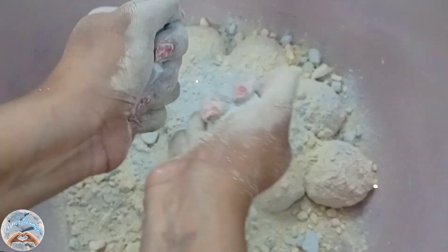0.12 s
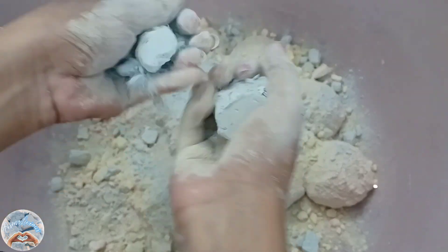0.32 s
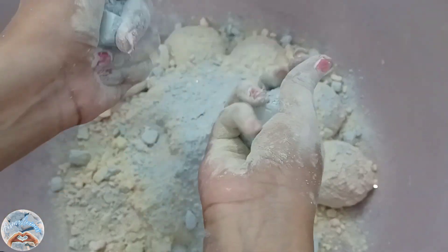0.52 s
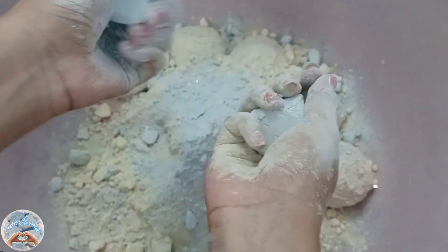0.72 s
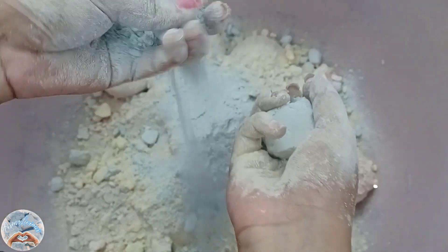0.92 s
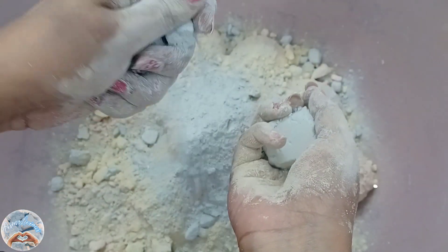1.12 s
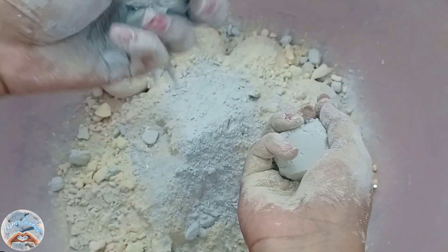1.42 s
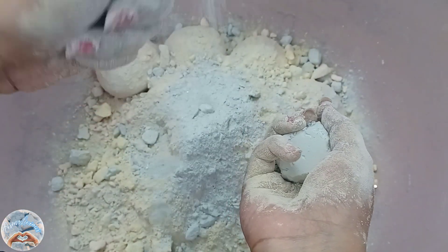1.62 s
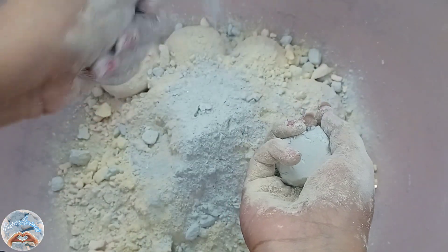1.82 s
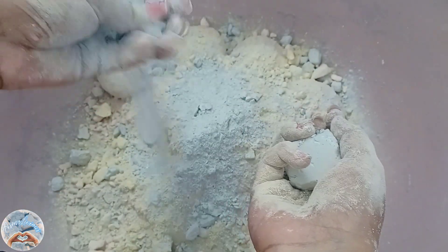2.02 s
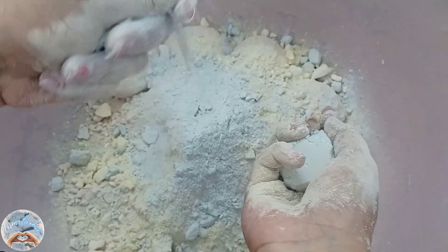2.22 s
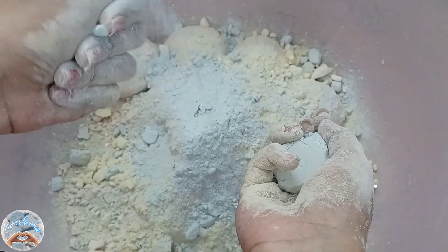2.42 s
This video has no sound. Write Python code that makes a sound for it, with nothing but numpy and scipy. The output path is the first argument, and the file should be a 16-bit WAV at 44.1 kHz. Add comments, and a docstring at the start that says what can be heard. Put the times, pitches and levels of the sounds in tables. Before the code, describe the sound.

Chalk crumbled by hand, close and dry. Faint tick at 0.07 s, then a loud, brittle cluster of cracks at 0.2 s with debris rattling until about 0.35 s. Quieter ticks, gritty rubs and soft hollow bowl knocks follow around 0.53, 0.95 and 1.45 s. A smaller crunch comes at 1.86 s, crisp snaps at 2.28 s. Thin powder hiss and steady low hum throughout.

```python
"""Chalk crumbled over a bowl

Hands crumble lumps of chalk over a bowl, heard up close in a quiet room with a low hum.
Ticks and cracks are noise puffs through resonances; slides, hiss and crumble are granular noise.
Falling bits ring the bowl, a sum of decaying modes; filtered noise and a sine make the room.
"""
import sys
import numpy as np
from scipy import signal
from scipy.fft import rfft, irfft
from scipy.io import wavfile
from scipy.ndimage import uniform_filter1d

SR = 44100
rng = np.random.default_rng(int(sys.argv[2]) if len(sys.argv) > 2 else 0)


def wrap_up_sound(samples):
    """Save the sound to the file named by the first command line argument, as 16-bit audio."""
    columns = np.atleast_2d(samples).T
    # keep every value between -1 and 1, then stretch to whole-number steps
    tamed = np.clip(columns, -1, 1)
    steps = np.round(tamed * 32767).astype(np.int16)
    wavfile.write(sys.argv[1], SR, steps)


def invert_db(level):
    """Linear amplitude ratio for a level in decibels (20 dB per decade), elementwise."""
    return 10 ** (np.asarray(level, dtype=float) / 20)


N = 112455  # length [samples]


def evened(x):
    """Power normalization: scales a signal to rms 1."""
    return x / np.sqrt(np.mean(x ** 2) + 1e-20)


def colour(x, points):
    """Linear filtering: weights the spectrum by (frequency [Hz], gain [dB]) over log frequency."""
    f, db = np.transpose(points)
    hz = np.fft.rfftfreq(N, 1 / SR)
    gain_db = np.interp(np.log(hz + 1), np.log(f + 1), db)
    return irfft(rfft(x) * invert_db(gain_db), N)


def add(mix, s, sound):
    """Superposition: adds a sound to the mix at a time in seconds."""
    part = mix[round(s * SR):][:len(sound)]
    part += sound[:len(part)]


def band(x, hz, q):
    """Resonance: a second-order peak passes energy around one frequency."""
    return signal.lfilter(*signal.iirpeak(min(hz, SR / 2.5), max(q, .3), SR), x)


def snap(noise, db, hz, q, t60, air_db):
    """Impulsive excitation: a spike and a noise puff drive a broad body, its ring and a sharp edge."""
    rise_s, spike, edge_hz = .001, 1.6, 10100
    tail_db, tail_t60_s, ring_db = -18, 0.028, -15
    t = np.arange(len(noise)) / SR
    rise = np.minimum(t / rise_s, 1) ** 2
    decay = invert_db(-60 * t / max(t60 / 2, .001)) + invert_db(tail_db - 60 * t / tail_t60_s)
    drive = noise * rise * decay
    drive[round(rise_s * SR)] += spike * np.sign(noise[0])
    edge = signal.sosfilt(signal.butter(2, edge_hz, "high", fs=SR, output="sos"), drive)
    body = band(band(drive, hz, q), hz, q)
    ring_q = hz * t60 * np.pi / np.log(1000)  # the Q of a resonance with this decay time
    rings = band(body, hz, ring_q)
    body, rings, edge = (v / abs(v).max() for v in (body, rings, edge))
    return invert_db(db) * (body + invert_db(ring_db) * rings + invert_db(air_db) * edge)


# crumbs snapping: (time [s], body peak level [dB], centre frequency [Hz], edge level re body [dB])
CRUMB_TICKS = [(0.0697, -12.5, 7140, -32), (0.1702, -18.5, 5100, -15), (0.178, -12, 9000, -22),
               (0.196, -11, 5670, -20), (0.201, -48, 4380, -11), (0.2057, -6, 4020, 8),
               (0.2111, 1.5, 6980, -33), (0.244, -23, 5500, -16), (0.3182, -20.5, 5170, -30),
               (0.33, -28, 5960, -18), (0.3945, -22.5, 11100, -14), (0.4227, -25, 5550, -22),
               (0.5312, -13.5, 10500, -4), (0.62, -16.5, 10300, -26), (0.8538, -21.5, 8100, -25),
               (0.9398, -24, 8300, -8), (0.9534, -17.5, 8300, -26), (0.9726, -22, 7930, -24),
               (0.9778, -24, 8000, -26), (1.0345, -23, 4960, -25), (1.0408, -19.5, 7600, -20),
               (1.0755, -18, 7050, -23), (1.1717, -15, 11100, -13), (1.184, -15.5, 10900, -17),
               (1.4437, -14, 9800, -12), (1.456, -19, 8000, -25), (1.486, -19.5, 8600, -35),
               (1.5095, -23, 9870, -27), (1.58, -25.5, 7760, -21), (1.6412, -16.5, 5870, -27),
               (1.6697, -15, 8730, -35), (1.8462, -13.5, 9000, -18), (1.855, -7.5, 6730, -26),
               (1.8594, -11, 6240, -20), (1.8687, -23, 5200, -15), (1.942, -12.5, 8500, -27),
               (1.9506, -17, 8500, -6), (1.9654, -8, 8200, -33), (2.064, -12.5, 9000, 2),
               (2.071, -21, 8200, -22), (2.103, -19.5, 5800, -26), (2.171, -14, 6700, -18),
               (2.2795, -5.5, 7400, -15), (2.2858, -6, 8850, -10), (2.4384, -18.5, 8700, -31),
               (2.4616, -25.5, 9150, -6), (2.5094, -19.5, 7100, -39)]


def ticks():
    """Broadband transients: small crumbs snap as short, high, heavily damped puffs."""
    out = np.zeros(N)
    noises = rng.standard_normal((len(CRUMB_TICKS), 2048))
    for (s, db, hz, edge_db), noise in zip(CRUMB_TICKS, noises):
        add(out, s, snap(noise, db, hz, q=1.2, t60=.005, air_db=edge_db))
    return out


# lumps cracking: (time [s], body peak level [dB], centre frequency [Hz], ring t60 [s])
LUMP_CRACKS = [(0.0704, -31.5, 1335, 0.055), (0.17, -24.5, 1140, 0.04), (0.179, -24, 1060, 0.034),
               (0.1934, -21, 1520, 0.042), (0.2002, -4, 1720, 0.015), (0.2039, -6.5, 1330, 0.012),
               (0.205, -2.5, 1900, 0.033), (0.2104, 1.5, 1364, 0.014), (0.2158, -30, 1500, 0.0046),
               (0.2438, -8.5, 1840, 0.012), (0.2474, -19, 1080, 0.022), (0.3182, -40.5, 1810, 0.029),
               (0.3302, -24, 1250, 0.024), (0.3407, -27.5, 1720, 0.017), (0.5313, -28, 1720, 0.011),
               (0.8869, -38.5, 1007, 0.011), (0.9522, -34, 1520, 0.009), (0.9835, -32, 1310, 0.012),
               (1.0344, -18, 2060, 0.0051), (1.6402, -31.5, 1220, 0.022), (1.6671, -31, 1290, 0.015),
               (1.8385, -24, 2400, 0.015), (1.8598, -9, 3450, 0.0021), (1.8758, -27, 3800, 0.012),
               (1.9933, -33.5, 2190, 0.029), (2.171, -30, 2784, 0.11), (2.2326, -30, 2630, 0.021),
               (2.2804, -28, 1200, 0.022), (2.2864, -22, 1820, 0.037), (2.5106, -36.5, 1120, 0.014)]


def cracks():
    """Brittle fracture: lumps break between the fingers as lower puffs, each with its own decay."""
    out = np.zeros(N)
    noises = rng.standard_normal((len(LUMP_CRACKS), 2048))
    for (s, db, hz, t60), noise in zip(LUMP_CRACKS, noises):
        add(out, s, snap(noise, db, hz, q=1.13, t60=t60, air_db=-22))
    return out


def grains(per_s, spread_db, share, t60):
    """Shot noise: sparse clicks of uneven size, smeared into puffs and mixed with smooth noise."""
    spread = spread_db * np.minimum(rng.exponential(1, N), 5)
    size = invert_db(spread) * (rng.random(N) < per_s / SR)
    puffs = np.sqrt(signal.lfilter([1], [1, -invert_db(-120 / (t60 * SR))], size ** 2))  # smears power
    share = np.clip(share, 0, 1)
    grainy = evened(puffs * rng.standard_normal(N))
    smooth = rng.standard_normal(N)
    return np.sqrt(share) * grainy + np.sqrt(1 - share) * smooth


def grit(points, edges_hz, *grain):
    """Independent grain trains: large and small grains fall apart in time but flutter together."""
    flutter_db, flutter_s = 1.6, .01
    hz, total = np.fft.rfftfreq(N, 1 / SR), 0
    for lo, hi in zip(edges_hz, edges_hz[1:]):
        train = rfft(grains(*grain))
        total = total + train / (1 + (lo / (hz + 1)) ** 6) / (1 + (hz / hi) ** 6)
    span = round(flutter_s * SR)
    flutter = evened(uniform_filter1d(uniform_filter1d(rng.standard_normal(N), span), span))
    return evened(invert_db(flutter_db * flutter) * colour(irfft(total, N), points))


# crumble spectrum: (frequency [Hz], relative level [dB])
CRUMBLE_SPECTRUM = [(500, -25), (800, -6), (1200, 0), (1800, -2), (2500, -6), (3500, -12), (5000, -19),
                    (9000, -36)]


def crumbs():
    """Granular noise: crumbs break off and tumble, at rms 1."""
    per_s, spread_db, share, t60_s = 420, 2.8, .55, .006
    return grit(CRUMBLE_SPECTRUM, [300, 1100, 2000, 3500, 12000], per_s, spread_db, share, t60_s)


# bits of the broken lump rattling down: (time [s], level [dB])
DEBRIS_LEVEL = [(.2, -60), (0.213, -57), (0.239, -27.5), (.262, -34), (0.269, -37.5), (.31, -41.5),
                (.35, -49), (.37, -66), (0.497, -50.5), (.52, -93)]


def debris():
    """Amplitude modulation: bits of the broken lump tumble over each other, rising and dying away."""
    s, db = np.transpose(DEBRIS_LEVEL)
    level_db = np.interp(np.arange(N) / SR, s, db, -120, -120)
    return invert_db(level_db) * crumbs()


# fingers sliding on powder; the last three rows are lower, broad rattles of bits around the bigger crushes:
# (start [s], length [s], rms level before fades [dB], centre frequency [Hz])
BROAD_RUBS = [(.215, 0.053, -36, 7300), (.42, 0.091, -45, 7400), (.654, 0.06, -42, 8200),
              (.9, .04, -41.5, 9500), (.99, 0.023, -38.5, 9000), (1.086, 0.013, -31, 8200),
              (1.295, 0.047, -34, 8700), (1.80, .02, -41, 9150), (1.978, 0.025, -37.5, 8500),
              (2.09, .03, -39.5, 7500), (.975, 0.025, -38.5, 1800), (1.832, 0.066, -40, 4400),
              (2.276, 0.054, -46, 2020)]
# hard crumbs skidding: (start [s], length [s], rms level before fades [dB], own pitch [Hz])
CRUMB_SKIDS = [(.462, 0.062, -49, 1150), (.558, 0.01, -37, 1020), (.588, 0.0077, -35, 1050),
               (1.088, 0.038, -44.5, 2620), (1.443, 0.045, -44, 1047), (2.207, 0.03, -45.5, 2490),
               (2.32, 0.014, -40.5, 1700)]


def slides():
    """Friction noise: granular scrape through a broad (rub) or narrower (skid) resonance."""
    out = np.zeros(N)
    scrape = grains(per_s=1100, spread_db=3.4, share=.7, t60=.002)
    # a power below 1 makes skids peak early and die away
    for table, q, power in ((BROAD_RUBS, 1.2, 1), (CRUMB_SKIDS, 5.5, .5)):
        for s, length, db, hz in table:
            part = scrape[round(s * SR):][:round(length * SR)]
            fade = np.sin(np.pi * np.linspace(0, 1, len(part)) ** power)
            add(out, s, invert_db(db) * evened(band(band(part, hz, q), hz, q)) * fade)
    return out


# powder hiss spectrum: (frequency [Hz], relative level [dB])
HISS_SPECTRUM = [(2000, -15.5), (3500, -15), (4500, -4), (5500, 0), (7000, 3), (9000, 2), (12000, 0.5),
                 (15500, -1.5), (17000, -37)]


def powder():
    """Granular noise: many fine grains of powder hiss through the hand, at rms 1."""
    per_s, spread_db, share, t60_s = 900, 3.6, .6, .003
    return grit(HISS_SPECTRUM, [1500, 6000, 9000, 12500, 20000], per_s, spread_db, share, t60_s)


# the hand's work: (time [s], powder hiss level [dB], crumble level [dB], trickle on the bowl level [dB])
HAND_WORK = [(0.0, -45, -44, -51.5), (0.16, -47, -67.5, -51), (0.29, -41.5, -44.5, -40.5),
             (0.38, -42.5, -50, -65), (0.46, -42, -61, -46), (0.59, -46, -55.5, -57),
             (0.7, -48.5, -97, -100), (0.911, -45.5, -65, -43), (1.06, -41, -53, -45.5),
             (1.13, -43.5, -57, -55), (1.28, -43.5, -61, -67), (1.43, -50.5, -92, -59),
             (1.53, -41.5, -57.5, -45.5), (1.68, -42.5, -52, -48.5), (1.77, -47, -72, -45),
             (1.858, -39.5, -38.5, -38), (1.94, -45, -58.5, -40), (2.06, -41.5, -53.5, -47),
             (2.16, -41, -52.5, -51.5), (2.29, -41.5, -51, -37), (2.45, -45.5, -68, -59),
             (2.55, -46.5, -60, -40.5)]


def work(column):
    """Envelope control: gain over time from one column of the hand's work."""
    rows = np.array(HAND_WORK)
    return invert_db(np.interp(np.arange(N) / SR, rows[:, 0], rows[:, column]))


def chalk():
    """Superposition: ticks, cracks and slides at their moments, over hiss and crumble."""
    steady = work(column=1) * powder() + work(column=2) * crumbs()
    return ticks() + cracks() + slides() + steady


def ring(modes, luck, t):
    """Modal synthesis: softly starting, decaying sines; luck shifts each mode's level and pitch."""
    rise_s, spread_db, detune = 0.0019, 2.2, .03  # detune is a fraction of the frequency
    total = 0
    for (hz, db, t60), z in zip(modes, luck):
        decay = invert_db(db + spread_db * z - 60 * t / t60)
        total = total + decay * np.sin(2 * np.pi * hz * (1 + detune * z) * t)
    return (1 - np.exp(-t / rise_s)) * total


# bits landing in the bowl: (time [s], level [dB], upper modes' level re lower, a hardness [dB])
BOWL_KNOCKS = [(0.072, -30, -6), (0.2, -22.5, 13), (0.209, -9, -31), (0.216, -16.5, -0.5),
               (0.244, -17, -17), (0.253, -14, -1.5), (0.514, -35, 3), (0.533, -15, 2.5), (0.559, -28, 4),
               (0.576, -36, 6), (0.589, -27.5, 0), (0.62, -23, -7.5), (0.648, -33.5, -6), (0.879, -39, -20),
               (0.912, -26, -11), (0.944, -22.5, -26), (0.953, -16.5, -5), (0.98, -23, 3),
               (1.033, -29, -13), (1.311, -24.5, -11), (1.446, -31.5, -6), (1.456, -27, -4),
               (1.512, -23.5, -12), (1.642, -31, 3), (1.671, -19.5, -18), (1.709, -23, -6.5),
               (1.72, -22.5, -8), (1.839, -23, 4.5), (1.845, -20, -3), (1.92, -23, -4), (1.968, -25, -27),
               (1.987, -23, -36), (2.07, -26.5, -30), (2.153, -28.5, -29), (2.171, -21.5, -8),
               (2.236, -22, -23), (2.25, -38, -8), (2.265, -18, -5.5), (2.287, -25, -3)]
# lower and upper bowl modes: (nominal frequency [Hz], nominal level [dB], t60 [s])
LOW_MODES = [(124, -8, 0.04), (316.2, -3, 0.033), (371.7, -2, 0.052), (452.5, -10, 0.031)]
HIGH_MODES = [(600, -1, .018), (735, 1, .028), (880, -7, .018), (1120, -10, .016)]


def bowl():
    """Modal excitation: knocks of larger bits and a trickle of crumbs ring the same modes."""
    out, t = np.zeros(N), np.arange(6000) / SR
    # each blow lands elsewhere and weights the modes anew
    for (s, db, hard_db), z in zip(BOWL_KNOCKS, rng.standard_normal((len(BOWL_KNOCKS), 8))):
        knock = ring(LOW_MODES, z, t) + invert_db(hard_db) * ring(HIGH_MODES, z[4:], t)
        add(out, s, invert_db(db) * knock)
    out = signal.sosfilt(signal.butter(2, 85, "high", fs=SR, output="sos"), out)
    still = np.zeros(4)
    tap = ring(LOW_MODES, still, t) + invert_db(-7.5) * ring(HIGH_MODES, still, t)
    falling = grains(per_s=320, spread_db=4.0, share=0.6, t60=0.0017)
    trickle = evened(signal.oaconvolve(falling, tap)[:N])
    return out + work(column=3) * trickle


# room rumble spectrum: (frequency [Hz], relative level [dB])
ROOM_SPECTRUM = [(20, 11.5), (60, -14), (100, -1), (160, 0.5), (260, -9), (400, -15), (600, -95),
                 (1500, -39.5), (16000, -63)]


def room():
    """Stationary background: coloured noise, plus a sine hum with a narrow noise band around it."""
    hum_hz, fuzz_width_hz = 201.4, 13
    hum_db, fuzz_db, rumble_db = -40.5, -42, -40.5  # rms levels
    t = np.arange(N) / SR
    tone = np.sqrt(2) * np.sin(2 * np.pi * (hum_hz * t + rng.random()))
    fuzz = evened(band(rng.standard_normal(N), hum_hz, hum_hz / fuzz_width_hz))
    rumble = evened(colour(rng.standard_normal(N), ROOM_SPECTRUM))
    return invert_db(hum_db) * tone + invert_db(fuzz_db) * fuzz + invert_db(rumble_db) * rumble


# left-right difference spectrum: (frequency [Hz], relative level [dB])
SIDE_SPECTRUM = [(24, -18), (40, -45), (109, -6.5), (231, -40), (382, -10), (1150, -30), (1520, -26.5),
                 (1760, -39.5), (9220, -16), (16000, -18.5)]


def side_noise():
    """Decorrelation: faint noise, in patches of time and frequency, for opposite signs left and right."""
    patch_share, level_db = .42, -57.5
    noise = colour(rng.standard_normal(N), SIDE_SPECTRUM)
    z = signal.stft(noise, SR, nperseg=1024)[2]
    field = uniform_filter1d(rng.standard_normal(z.shape), size=90, axis=0)
    field = uniform_filter1d(field, size=3, axis=1)
    z = z * (field > np.quantile(field, 1 - patch_share))
    return invert_db(level_db) * evened(signal.istft(z, SR, nperseg=1024)[1][:N])


def scene():
    """Phantom centre: identical channels place all sources in the middle."""
    mid = chalk() + debris() + bowl() + room()
    return np.array([mid, mid])


def band_limit(x):
    """A steep low-pass at the top of the band."""
    return signal.sosfilt(signal.butter(12, 16860, fs=SR, output="sos"), x)


def record(dry):
    """Band limiting and saturation: side noise, low cut, steep treble limit and soft overload."""
    low_cut_hz, treble_limit_hz, ceiling = 65, 15850, .9
    side = side_noise()
    low_cut = signal.butter(2, low_cut_hz, "high", fs=SR, output="sos")
    cut = signal.sosfilt(low_cut, dry + [side, -side])
    treble_limit = signal.firwin(511, treble_limit_hz, window=("kaiser", 5), fs=SR)
    cut = signal.oaconvolve(cut, treble_limit[None], "same")
    mix = ceiling * np.tanh(cut / ceiling)
    return band_limit(mix)


dry = scene()
out = record(dry)
wrap_up_sound(out)
```